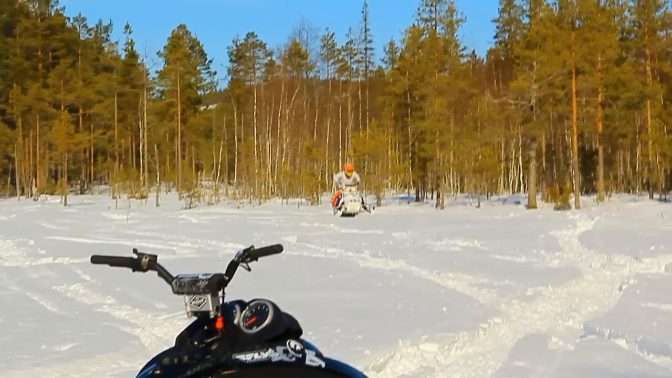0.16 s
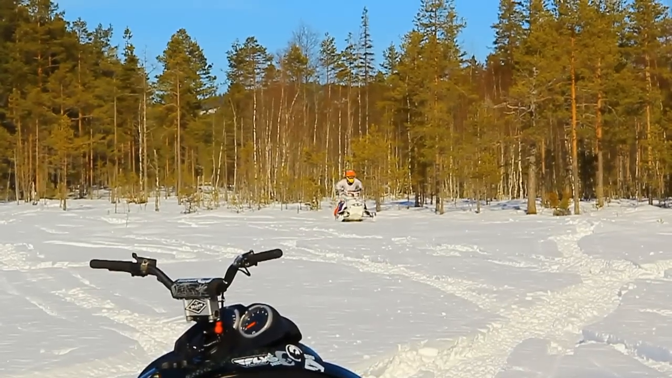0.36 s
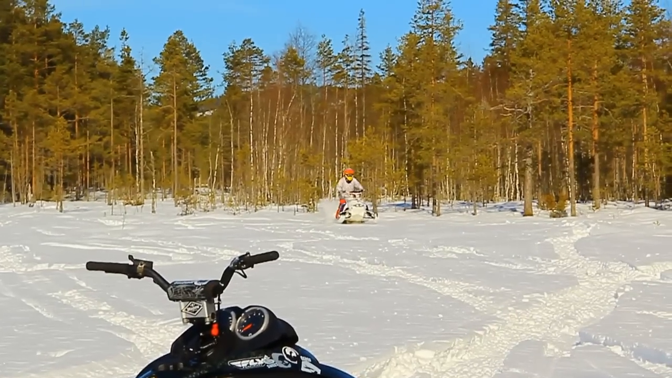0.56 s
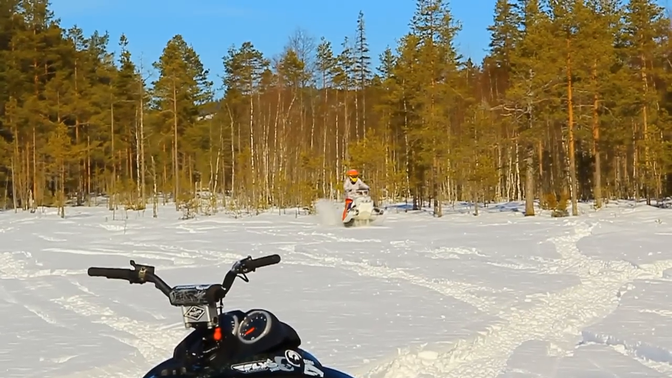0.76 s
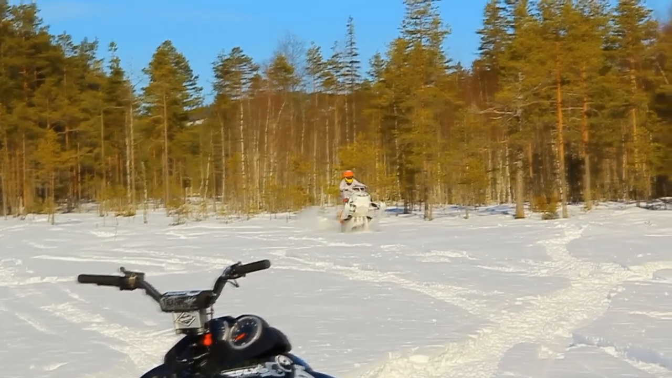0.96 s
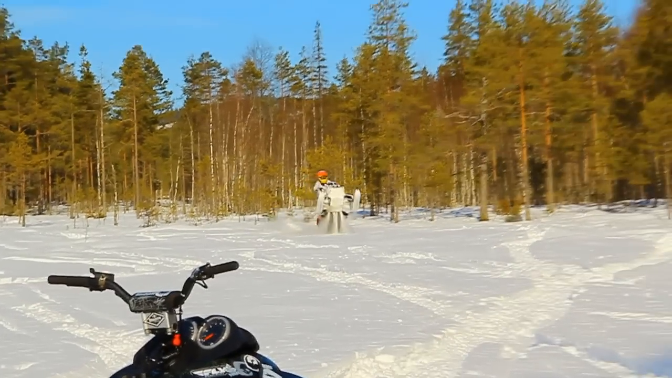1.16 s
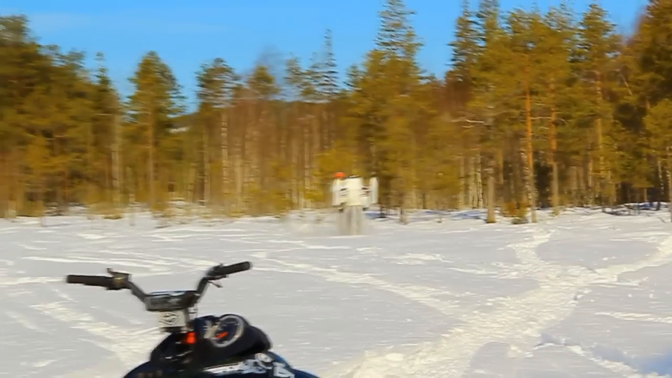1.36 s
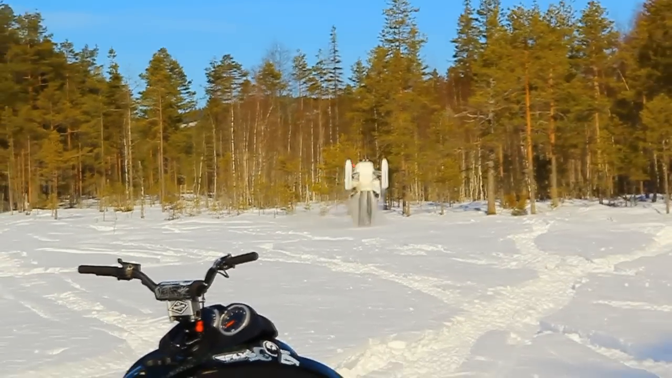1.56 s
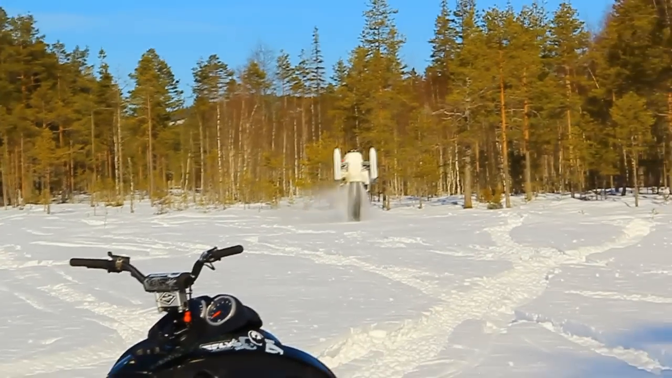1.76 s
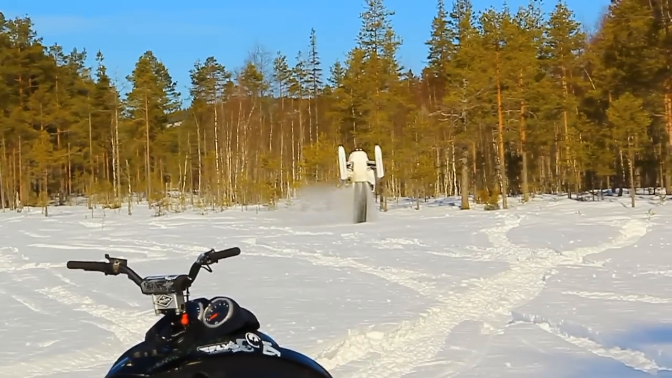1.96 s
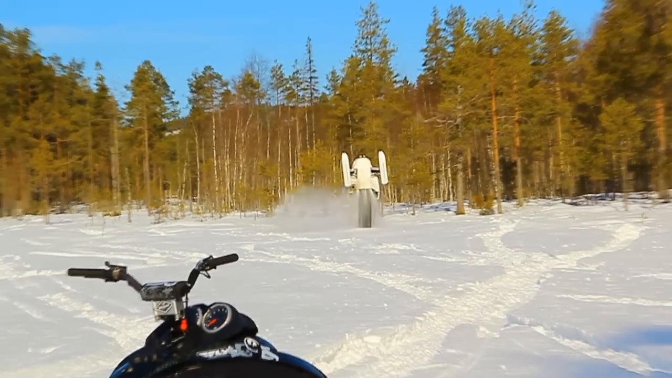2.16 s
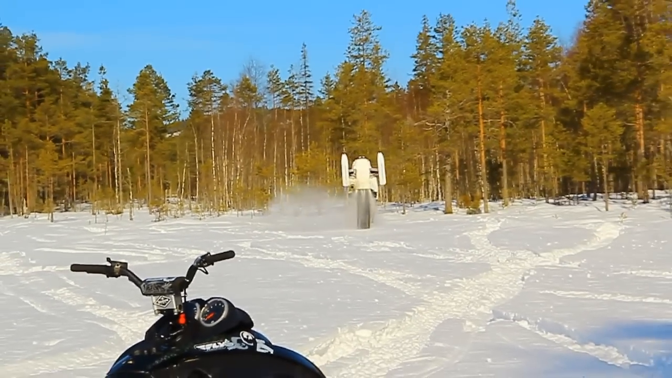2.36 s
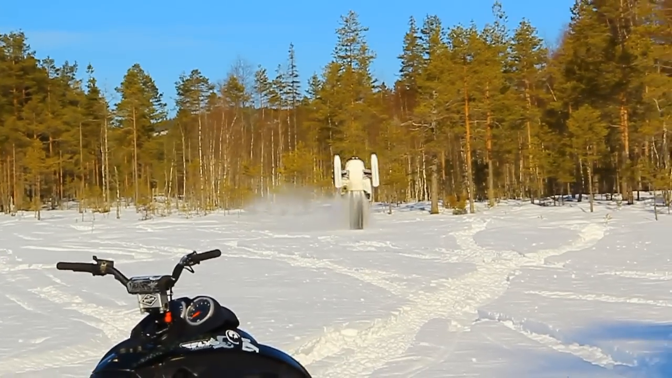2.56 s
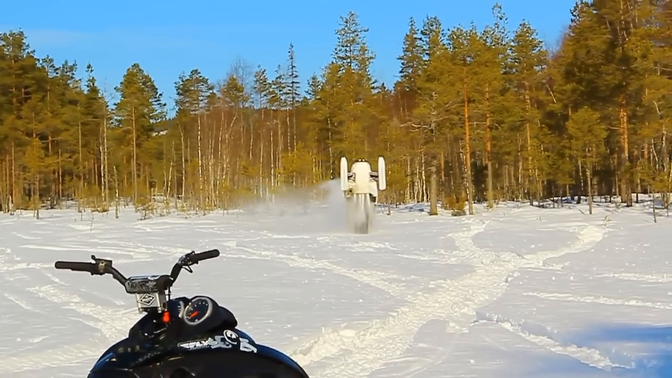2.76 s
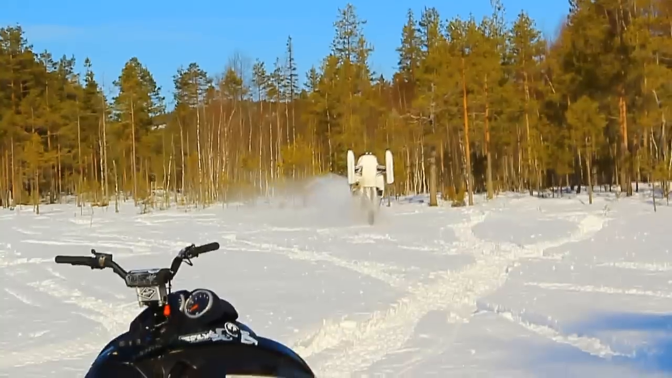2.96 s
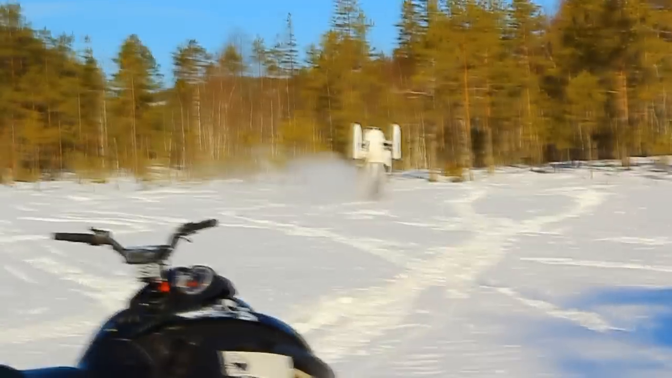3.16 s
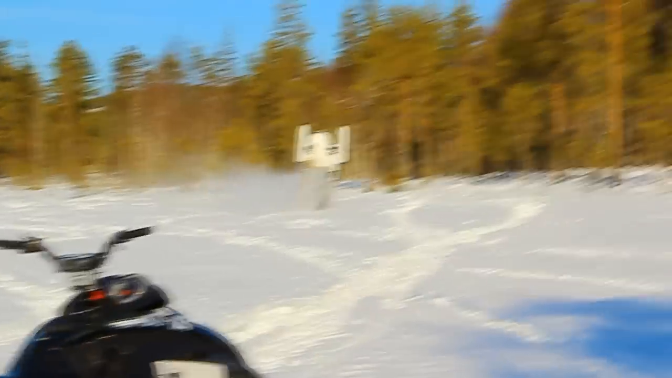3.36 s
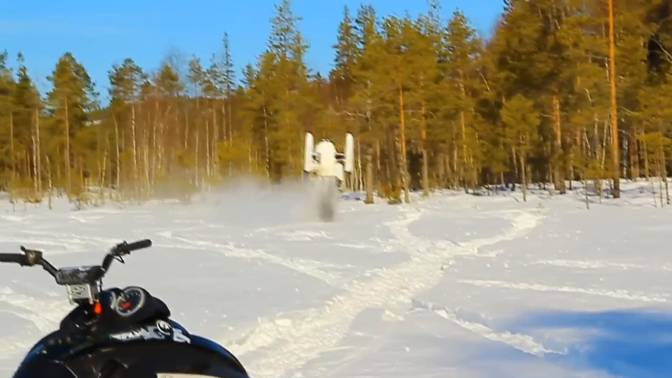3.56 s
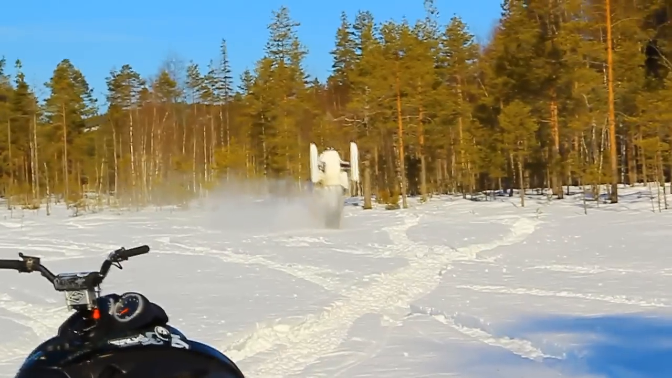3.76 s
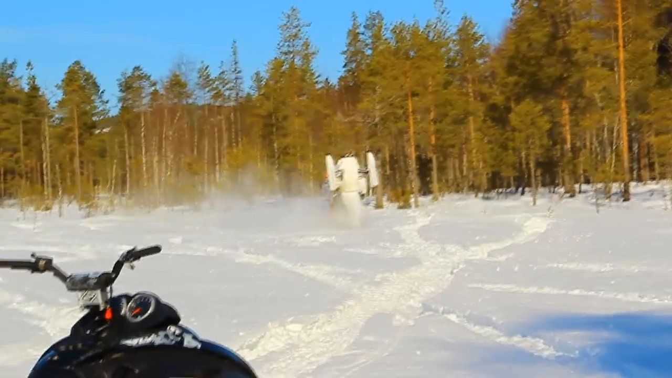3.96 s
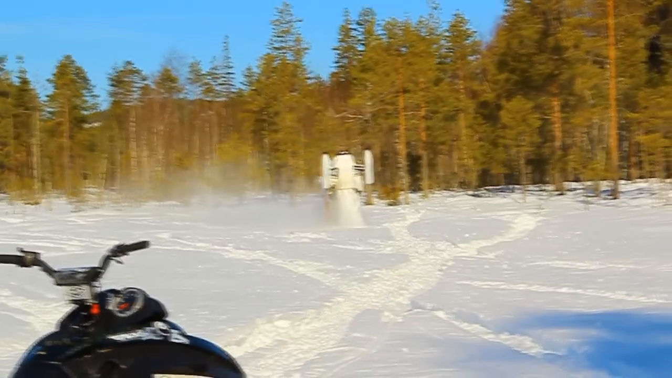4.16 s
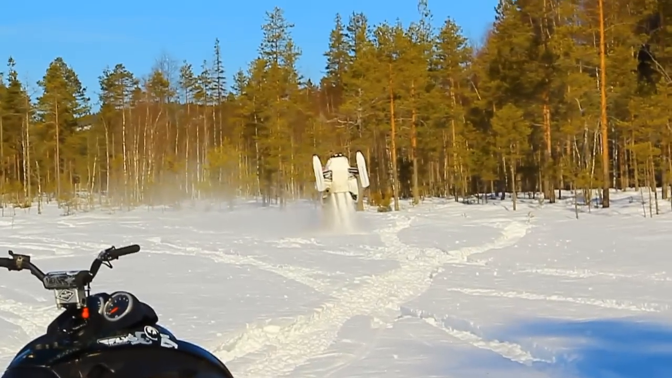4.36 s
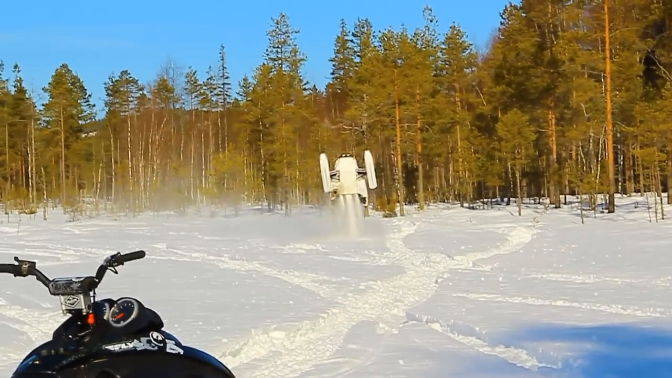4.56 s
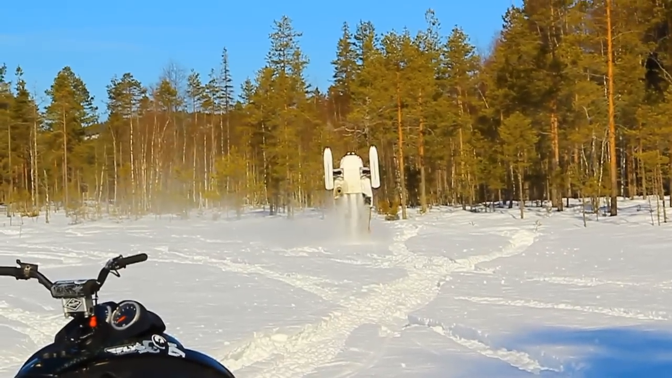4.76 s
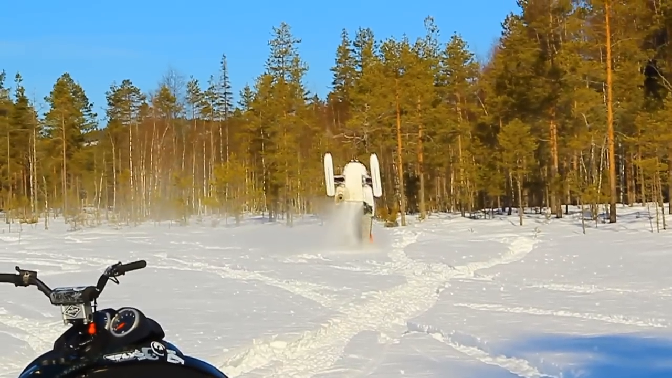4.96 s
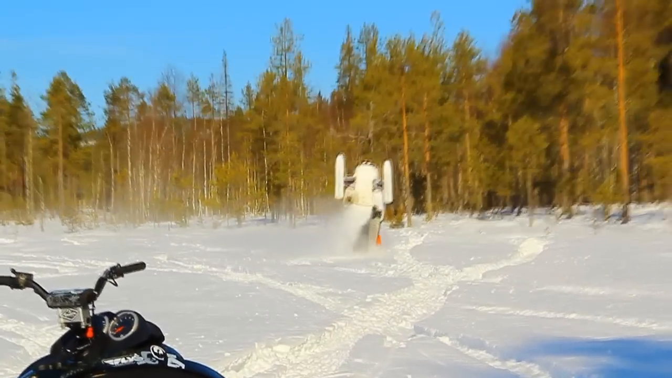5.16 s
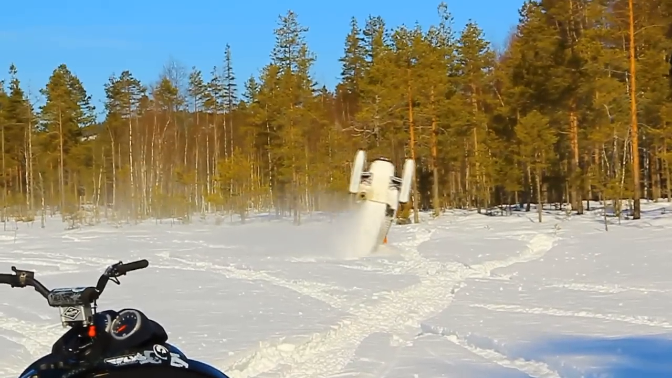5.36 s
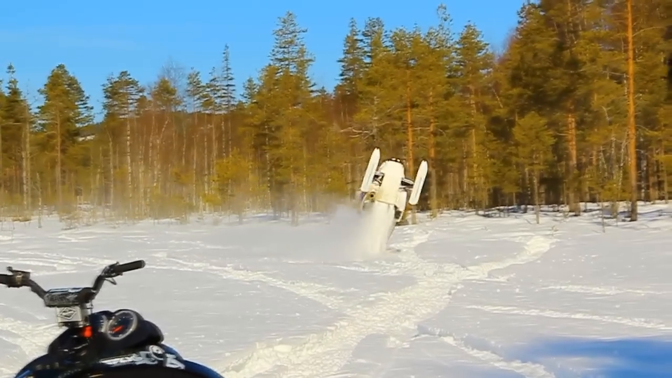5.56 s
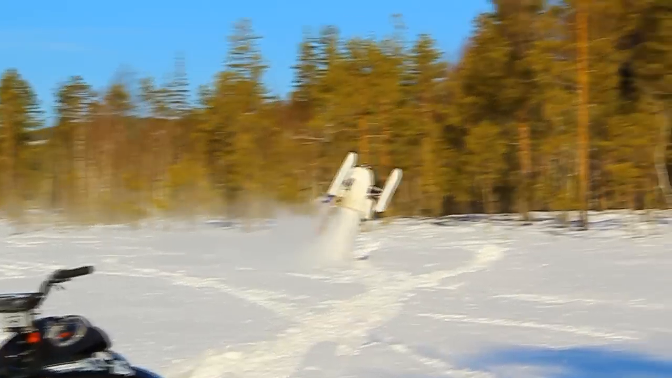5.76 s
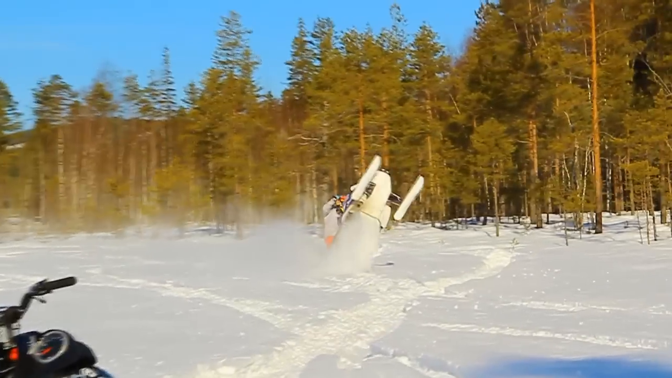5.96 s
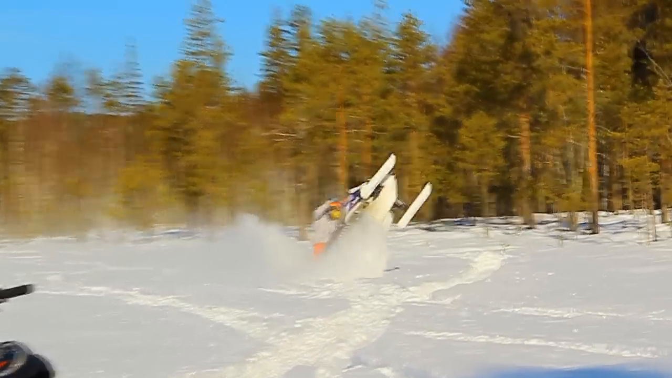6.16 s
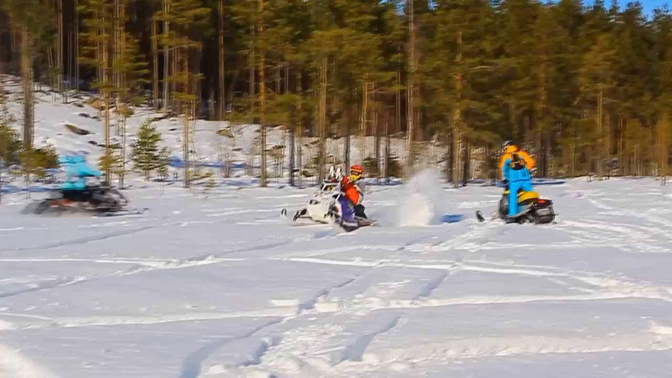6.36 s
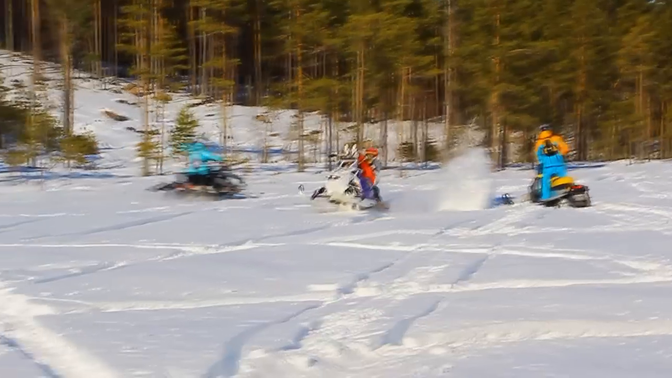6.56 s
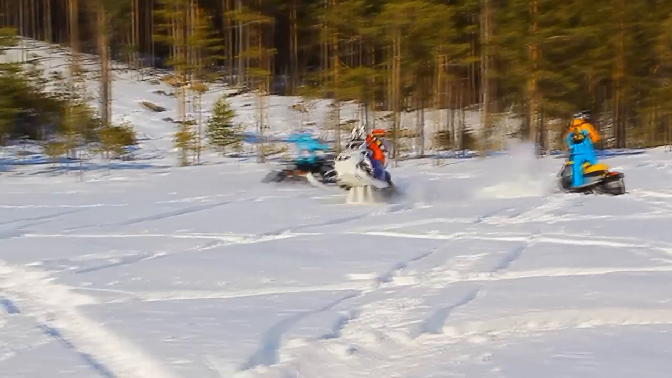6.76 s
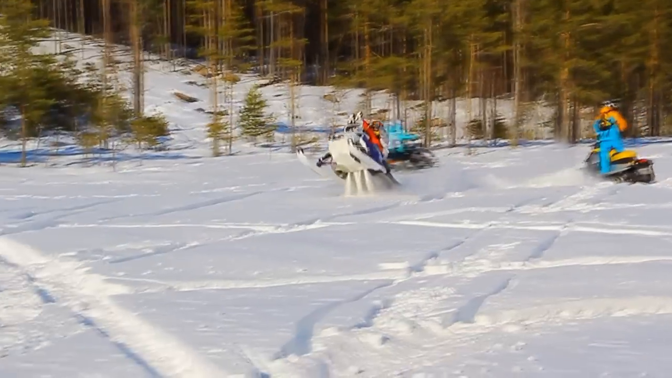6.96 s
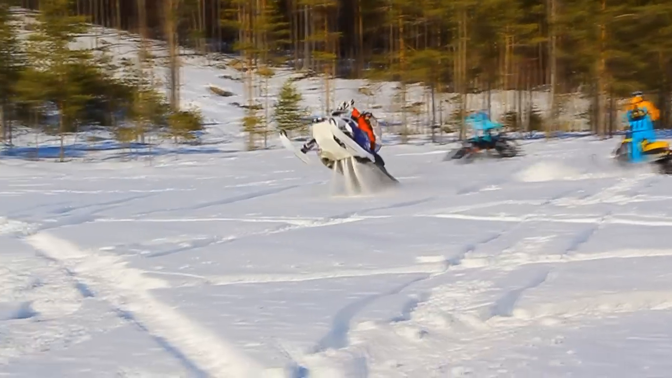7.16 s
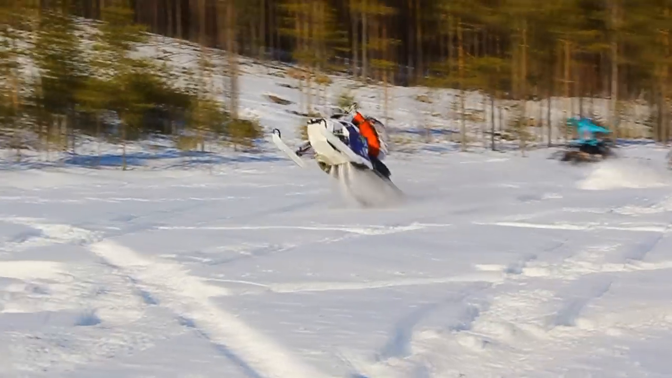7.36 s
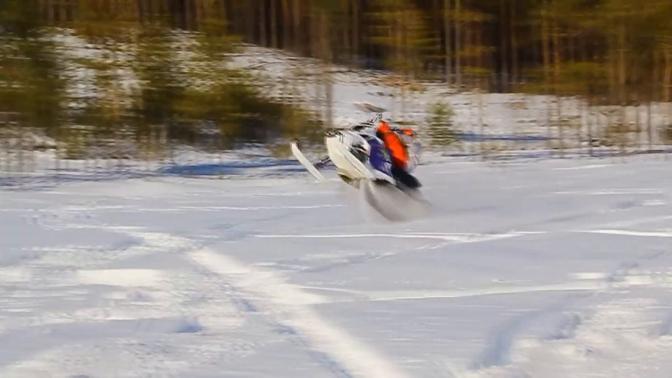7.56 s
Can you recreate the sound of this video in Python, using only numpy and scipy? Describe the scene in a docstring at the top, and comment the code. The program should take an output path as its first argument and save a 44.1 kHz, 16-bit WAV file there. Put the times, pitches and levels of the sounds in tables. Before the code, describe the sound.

Light wind rumbles and bumps softly on an open-air microphone while a distant snowmobile pulls away, its buzz rising fast in pitch and volume. It becomes a sustained, rough high drone, booming and rasping as the track bites snow, dipping briefly when the rider eases off. A sudden tiny gap leads to a clearer, harsher side view, then the engine drops into a quieter sputtering coast. Trees add a short echo.

```python
"""Snowmobile wheelie across a clearing

A two-stroke snowmobile pulls away over snow and rides a long wheelie at full throttle.
Abruptly, after an instant's dip in level, it is heard side-on and brighter, until the throttle shuts.
Firing pulses and gas and snow hiss ring an exhaust pipe whose colour follows the machine's pose.
A decaying noise tail echoes it from the forest edge; low noise and dull bumps make the light wind."""
import sys
import numpy as np
from scipy import signal
from scipy.fft import rfft, irfft, next_fast_len
from scipy.io import wavfile
from scipy.ndimage import uniform_filter1d, map_coordinates

SR = 44100
rng = np.random.default_rng(int(sys.argv[2]) if len(sys.argv) > 2 else 0)


def pcm_store(signal):
    """Save signal as 16-bit PCM."""
    levels = np.round(np.clip(np.atleast_2d(signal), -1, 1) * 32767)
    wavfile.write(sys.argv[1], SR, levels.astype(np.int16).T)


N = 339570  # length [samples]
SIDE_ON_S, THROTTLE_SHUT_S = 6.477, 7.51


def amp(db):
    """Decibels to gain."""
    return 10 ** (np.asarray(db) / 20)


def unit(x):
    """Scale to rms 1."""
    return x / np.sqrt(np.mean(x ** 2) + 1e-20)


def along(points, hz):
    """Read (frequency, value) points on a log frequency axis."""
    f, v = np.transpose(points)
    return np.interp(np.log(hz + 1), np.log(f + 1), v)


def curves(rows):
    """One value per sample for each column after the time."""
    s, *cols = np.transpose(rows)
    return [np.interp(np.arange(N) / SR, s, c) for c in cols]


def swells(rows):
    """Sum of bell-shaped swells, one per row of (time [s], half length [s], height)."""
    t = np.arange(N) / SR
    return sum(height * np.exp(-((t - s) / half) ** 2) for s, half, height in rows)


def wobble(rate):
    """A smooth random curve with rate knots a second."""
    knots = rng.standard_normal(int(N * rate / SR) + 4)
    return map_coordinates(knots, [np.arange(N) * rate / SR])


def flutter(depth_db, rate):
    """A restless gain: slow drift and quicker flicker."""
    return amp(depth_db * (wobble(rate) + 0.29 * wobble(rate / 3)))


def filtered(x, response):
    """x times a response of frequency, padded so that the end does not wrap to the start."""
    m = next_fast_len(N + SR // 2)
    return irfft(rfft(x, m) * response(np.fft.rfftfreq(m, 1 / SR)), m)[..., :N]


def noise(spectrum):
    """Coloured noise of rms 1."""
    return unit(filtered(rng.standard_normal(N), lambda hz: amp(along(spectrum, hz))))


def ring(x, spectrum, size=2048):
    """Minimum-phase colour: every pulse gets a sharp front and a short ring."""
    level_db = np.maximum(along(spectrum, np.fft.rfftfreq(size, 1 / SR)), -70)
    cepstrum = irfft(np.log(amp(level_db)))
    # folding the cepstrum forward makes the response causal
    cepstrum[1:size // 2] *= 2
    cepstrum[size // 2 + 1:] = 0
    response = irfft(np.exp(rfft(cepstrum)))
    return signal.fftconvolve(x, response)[:N]


def steady(x, size=2205):
    """x with its running rms held near 1."""
    power = uniform_filter1d(uniform_filter1d(x * x, size), size)
    return x / np.sqrt(np.abs(power) + 1e-14)


# colour of the wind rumble: (frequency [Hz], relative level [dB])
WIND_COLOUR = [(20, -18), (50, -4.5), (90, -0.5), (150, -3), (220, -6), (400, -22), (900, -83.5)]
# wind between gusts: (time [s], level [dB])
BREEZE_LEVEL = [(0, -56), (1.2, -56.5), (2.6, -61), (3.3, -61.5), (4.7, -59), (5.7, -61), (7.2, -66),
                (7.7, -61)]
# gusts on the microphone: (time [s], half length [s], level [dB])
WIND_GUSTS = [(0.02, 0.067, -33.5), (.3, 0.24, -40.5), (.575, 0.028, -24), (0.666, 0.055, -33),
              (0.868, .09, -37.5), (1.654, .08, -40), (2.43, .05, -57), (3.934, 0.1, -36),
              (4.202, 0.24, -46.5), (4.576, 0.041, -46.5), (6.153, 0.053, -39.5), (6.53, .08, -46.5)]
# dull wind bumps: (time [s], level before onset and decay [dB], pitch [Hz])
WIND_BUMPS = [(0.021, -21, 71), (0.551, -9, 127), (0.568, -20, 131), (1.591, -27.5, 114), (3.889, -16, 116),
              (3.961, -17, 105)]


def wind():
    """A lumpy low rumble rises in gusts; each bump is a sine with a soft onset and a fast decay."""
    gusts = swells([(s, half, amp(db)) for s, half, db in WIND_GUSTS])
    strength = amp(curves(BREEZE_LEVEL)[0]) + gusts
    lumps = amp(2.5 * wobble(22))
    air = strength * unit(noise(WIND_COLOUR) * lumps)
    t = np.arange(SR // 8) / SR
    for s, db, hz in WIND_BUMPS:
        decay = amp(db - 60 * t / 0.054)  # 60 dB down in 54 ms
        onset = 1 - np.exp(-t / 0.0012)
        air[round(s * SR):][:len(t)] += decay * onset * np.sin(2 * np.pi * hz * t)
    return air


# how long the forest rings: (frequency [Hz], time to fall 60 dB [s])
FOREST_DECAY = [(200, 1.49), (1200, 1.26), (4000, 0.42), (12000, 0.25)]


def forest(x, gap):
    """Countless trunks scatter the sound back as a noise tail, swelling over gap [s], treble dying first."""
    hz, t, z = signal.stft(rng.standard_normal(SR), SR, nperseg=256)
    fade = amp(-60 * t / along(FOREST_DECAY, hz)[:, None]) * (1 - np.exp(-t / gap))
    colour_db = along([(250, -2.5), (600, 1.0), (1200, 4.5), (4000, 17.5), (10000, -33)], hz)
    colour = amp(colour_db)[:, None]
    energy = np.max(np.sum(fade ** 2, axis=1)) * t[1] * SR
    tail = signal.istft(z * fade * colour / np.sqrt(energy), SR, nperseg=256)[1]
    return signal.fftconvolve(x, tail)[:N]


# the bounce off the snow, head-on: (time [s], extra path delay [ms], share of the direct sound)
SNOW_PATH = [(1.1, .22, 0), (1.35, .24, .45), (1.7, .27, .45), (1.9, .28, 0)]


def snow_bounce(x):
    """A copy off the snow, whose growing delay draws notches down through the overtones."""
    delay_ms, share = curves(SNOW_PATH)
    return x + share * map_coordinates(x, [np.arange(N) - delay_ms * SR / 1000])


# pipe resonances of the howl: (frequency [Hz], width [Hz], relative level [dB])
HOWL_MODES = [(1200, 320, -7.5), (3277, 72, -6.5), (4650, 600, -18)]


def howl(db, decay):
    """Gas noise rings three pipe resonances for a moment as the side-on run begins; decay in s."""
    age = np.arange(N) / SR - SIDE_ON_S

    def modes(hz):
        return sum(amp(level) / (1 + (2 * (hz - centre) / width) ** 2)
                   for centre, width, level in HOWL_MODES)

    envelope = (age > 0) * np.exp(-(age / decay) ** 2)
    return amp(db) * envelope * unit(filtered(rng.standard_normal(N), modes))


def firings(turns, rough, jitter_ms, scatter_db, uneven, sputter):
    """One blowdown pulse per firing; rough burning scatters their timing and size."""
    count = np.arange(1, int(turns[-1]))
    at = np.interp(count, turns, np.arange(N))
    chance = rng.standard_normal((len(at), 3))
    spread = np.sqrt(rough[at.astype(int)])
    at = at + spread * chance[:, 0] * jitter_ms * SR / 1000
    strength = amp(scatter_db * spread * chance[:, 1])
    strength *= 1 + uneven * (-1) ** count  # the two cylinders differ a little
    # starved of fuel, only a few strokes fire hard
    strength *= 1 + sputter * (at > THROTTLE_SHUT_S * SR) * (chance[:, 2] > 1)
    # windowed sincs place each pulse between samples
    taps = at.astype(int)[:, None] + np.arange(-7, 9)
    lag = taps - at[:, None]
    shape = np.sinc(lag) * np.cos(np.pi * lag / 16) ** 2
    return np.bincount(np.clip(taps, 0, N - 1).ravel(), (shape * strength[:, None]).ravel(), N)


def shimmer(x, depth_db):
    """Moving air lets each overtone fade in and out on its own; depth_db has one value per sample."""
    hz, t, z = signal.stft(x, SR, nperseg=512)
    smoothing = np.outer(np.hanning(5), np.hanning(45))
    field = unit(signal.fftconvolve(rng.standard_normal(z.shape), smoothing, "same"))
    reach = along([(250, .3), (1000, .7), (3000, 1.1), (6000, 1), (10000, .6)], hz)[:, None]
    depth = np.interp(t * SR, np.arange(N), depth_db)
    return signal.istft(z * amp(depth * reach * field), nperseg=512)[1][:N]


# pose: (time [s], 0 dug in / 1 nose / 2 belly / 3 flank / 4 coasting)
POSE_PATH = [(0, 0), (.72, 0), (.82, 1), (1.62, 1), (1.88, 2), (6.475, 2), (6.479, 3), (7.5, 3), (7.57, 4),
             (7.7, 4)]


def poses():
    """Share of each of the five poses at every sample."""
    return np.clip(1 - np.abs(curves(POSE_PATH)[0] - np.arange(5)[:, None]), 0, 1)


# engine speed held through launch, wheelie, side-on run and coast: (time [s], firing rate [1/s])
ENGINE_SPEED = [(0.0, 132.4), (0.32, 162.2), (0.47, 193.2), (0.75, 240.6), (0.99, 281.7), (1.84, 283.7),
                (2.06, 275.2), (3.5, 274.6), (3.76, 279.7), (4.5, 277.6), (6.46, 273.1), (6.49, 266.1),
                (6.58, 281.0), (6.94, 291.2), (7.16, 289.4), (7.49, 274.3), (7.58, 247.5), (7.7, 219.5)]
# the rider eases off to balance and the speed sags:
# (time [s], half length [s], drop before flywheel smoothing [firings/s])
SPEED_SAGS = [(1.3, 0.072, 3.4), (1.75, 0.083, 11.4), (2.56, 0.052, 5.7), (3.48, 0.187, 4.4),
              (4.23, 0.281, 11.3), (4.97, 0.153, 28.3), (5.39, 0.119, 5.5), (5.78, 0.081, 10.2),
              (6.8, 0.042, 4.4)]
# gas and track hiss colour: (frequency [Hz], relative level [dB])
HISS_COLOUR = [(120, -39), (280, -33.5), (450, -21.5), (750, -17), (1800, -12), (3000, -4.5), (4500, -7.5),
               (6000, 0), (12000, -1.5)]
# exhaust colour in each pose: (frequency [Hz], relative level [dB])
DUG_IN_COLOUR = [(130, -36.5), (200, 3.5), (380, 6), (570, -2), (1150, 2), (1500, -1.5), (2150, -9.5),
                 (2450, -10), (3200, -22.5), (4200, -19.5), (5300, -34), (6500, -41), (8500, -46),
                 (15500, -50)]
NOSE_COLOUR = [(130, -25.5), (280, -9.5), (830, -11), (1120, 4), (1400, 1), (1980, 5), (2250, -4.5),
               (2550, -1), (3600, -11.5), (3950, -3), (5300, -14.5), (5800, -23), (7800, -26), (13000, -44),
               (15500, -43)]
BELLY_COLOUR = [(130, -36.5), (275, -8), (820, -2), (1100, 5), (1400, -0.5), (1930, -2.5), (2200, -12.5),
                (3500, -24.5), (4000, -19.5), (5000, -29), (6000, -40.5), (7400, -42.5), (9000, -51),
                (15000, -55)]
FLANK_COLOUR = [(130, -35), (285, -11.5), (860, -8.5), (1140, 2), (1450, -3), (1750, -1.5), (2900, -10.5),
                (4200, -9.5), (5700, -25), (7200, -27.5), (9500, -32), (11000, -39.5), (12500, -39.5),
                (15000, -45.5)]
COASTING_COLOUR = [(130, -35), (230, -9.5), (450, -13), (720, -11), (930, 4.5), (1120, -2.5), (1400, -8),
                   (2000, -13.5), (4000, -31.5), (6000, -35.5), (15000, -58)]


def engine(rough, fading_db):
    """Firing pulses and puffs of gas hiss (scaled by rough) ring the pipe, coloured by the pose."""
    # the flywheel rounds every change
    speed = uniform_filter1d(curves(ENGINE_SPEED)[0] - swells(SPEED_SAGS), size=1400)
    turns = np.cumsum(speed * (1 + .001 * wobble(18))) / SR  # one turn per firing
    pulses = unit(firings(turns, rough, jitter_ms=0.0016, scatter_db=1.0, uneven=0.0098, sputter=1.4))
    facing = poses()
    dug_in, belly = facing[0], facing[2]
    puff = unit(1 + 0.12 * np.cos(np.pi * turns) ** 4)
    hiss = filtered(rng.standard_normal(N), lambda hz: amp(along(HISS_COLOUR, hz)))
    spray = filtered(hiss, lambda hz: hz ** 6 / (hz ** 6 + 1900. ** 6))
    hiss = hiss + (1.08 * dug_in + 0.93 * belly) * spray  # a digging track throws more snow
    drive = shimmer(pulses, fading_db) + rough * puff * hiss
    colours = [DUG_IN_COLOUR, NOSE_COLOUR, BELLY_COLOUR, FLANK_COLOUR, COASTING_COLOUR]
    pipe = sum(share * ring(drive, colour) for share, colour in zip(facing, colours))
    return snow_bounce(pipe) + howl(db=-11, decay=0.069)


# the track bites into the snow: (time [s], half length [s], boom [dB], rasp [dB])
TRACK_BITES = [(0.857, 0.23, 11.5, -1.5), (2.4, 0.15, 6.5, 3), (3.944, 0.27, 11, 8.5), (4.56, .1, -3, 5.5),
               (5.2, 0.18, 5, 2), (6.146, 0.27, 9.5, 3.5), (6.586, 0.12, 5.5, 3.5)]
# share of the boom [dB per dB] that reaches the body and the turbulence
BODY_SHARE, ROUGH_SHARE = 0.65, 0.3


def surge():
    """Boom and rasp in dB that the biting track adds."""
    rows = np.array(TRACK_BITES)
    return swells(rows[:, :3]), swells(np.delete(rows, 2, axis=1))


# edges between hum, body, bark, rasp and fizz: (frequency [Hz])
REGISTER_EDGES = [400, 950, 2150, 5600]
# treble above the last edge: (time [s], relative level [dB])
TREBLE_LEVEL = [(0, 1.5), (.45, -6.5), (.72, -2.5), (.86, 1), (.96, -1), (1.16, 6), (1.27, -3.5), (1.72, 0),
                (2.1, 1), (3.9, -1), (4.75, 4), (5.8, 0.5), (6.46, 2.5), (6.5, 2), (6.95, 6), (7.08, -2),
                (7.36, 3), (7.56, -1), (7.61, -7)]
# loudness of the machine, before a small trim and flutter: (time [s], level [dB])
MACHINE_LEVEL = [(0, -36), (.12, -34), (.25, -29.5), (.45, -23), (.7, -19.5), (.82, -13), (.98, -12.5),
                 (1.12, -14.5), (1.35, -14.5), (1.68, -16.5), (1.76, -13), (2.2, -13), (2.45, -13),
                 (3.75, -13.5), (4.02, -11), (4.6, -14), (5.3, -14), (5.97, -14.5), (6.24, -13),
                 (6.65, -15), (7.0, -14), (7.42, -13.5), (7.505, -16), (7.52, -20.5), (7.7, -19.5)]
DULL_DB_PER_HZ = 0.22  # a sag takes the edge off the exhaust


def radiated(source, boom_db, rasp_db):
    """Surges tilt the low and high registers, sags dull the sound; the whole follows the loudness."""
    def registers(hz):
        below = [1 / (1 + (hz / edge) ** 12) for edge in REGISTER_EDGES]
        return np.diff([0 * hz, *below, 0 * hz + 1], axis=0)

    hum, body, bark, rasp, fizz = filtered(source, registers)
    low = amp(boom_db) * hum + amp(BODY_SHARE * boom_db) * body
    # overtones flutter together in the moving air
    treble = amp(curves(TREBLE_LEVEL)[0]) * flutter(depth_db=1.43, rate=36) * fizz
    edge_db = rasp_db - DULL_DB_PER_HZ * swells(SPEED_SAGS)
    high = amp(edge_db) * flutter(depth_db=0.54, rate=20) * (rasp + treble)
    loudness = amp(curves(MACHINE_LEVEL)[0] - 0.65) * flutter(depth_db=1.0, rate=20)
    return loudness * steady(low + bark + high)


# one row per pose, in pose order: (turbulence [dB], forest echo [dB], fading of the overtones [dB])
POSE_MANNER = [(8, -10.5, 2.5), (-2, -15.5, 1.15), (-2.5, -11.5, 3), (-3, -17, 1.4), (2, -13, 2)]


def scene():
    """Wind, forest echo and machine together; the level dips for an instant as the side-on run begins."""
    rough_db, echo_db, fading_db = np.transpose(POSE_MANNER) @ poses()
    boom_db, rasp_db = surge()
    rough = amp(rough_db + ROUGH_SHARE * boom_db)
    sled = radiated(engine(rough, fading_db), boom_db, rasp_db)
    echo = forest(amp(echo_db) * sled, gap=0.013)
    age = np.arange(N) / SR - SIDE_ON_S
    dip = 1 - 0.9 * np.exp(-((age + 0.00071) / 0.0038) ** 2)
    return (dip * (sled + echo + wind()))[None]


TOP_HZ = 15850


def record(dry):
    """Soft saturation rounds the highest peaks, then a steep cut removes all from TOP_HZ up."""
    rounded = dry / (1 + np.abs(dry) ** 8) ** (1 / 8)
    return filtered(rounded, lambda hz: hz < TOP_HZ)


dry = scene()
out = record(dry)
pcm_store(out)
```